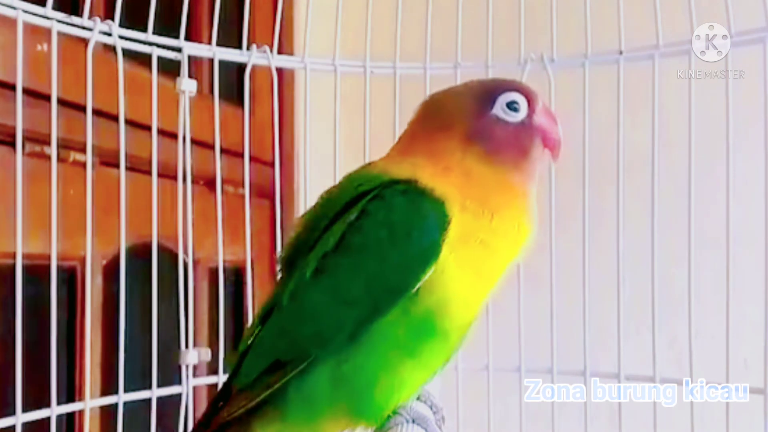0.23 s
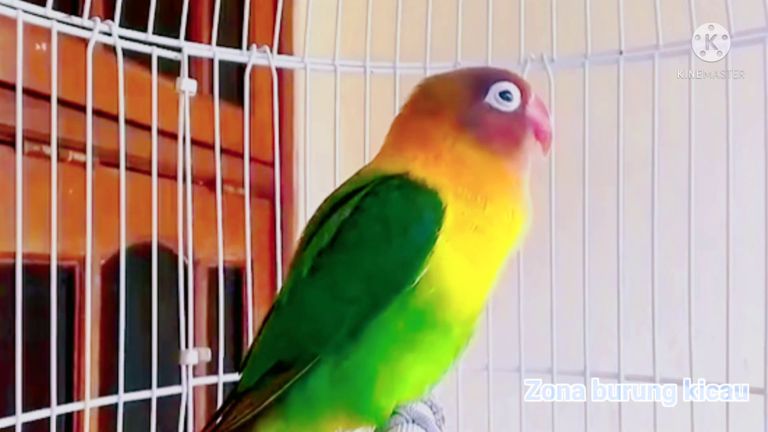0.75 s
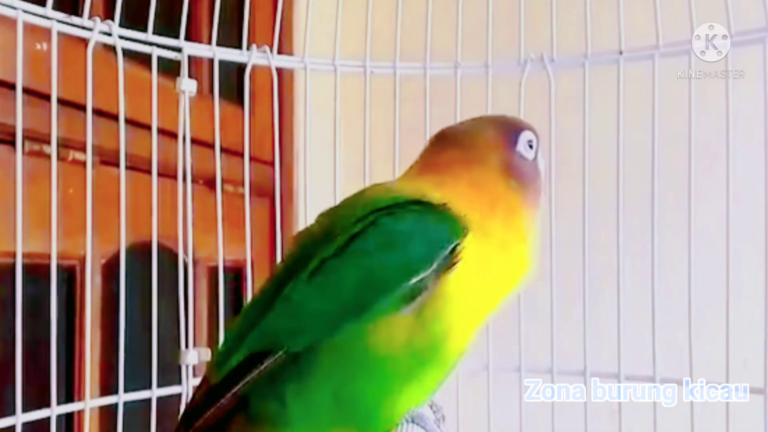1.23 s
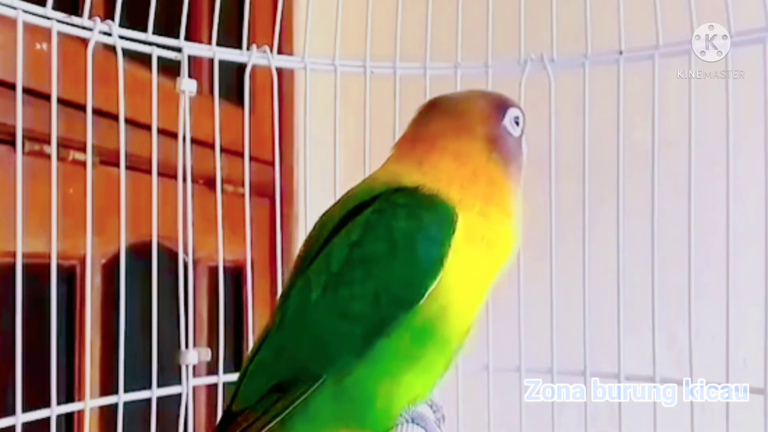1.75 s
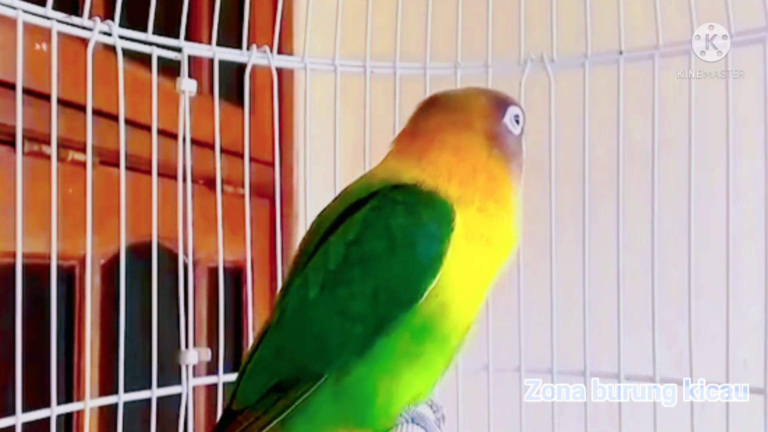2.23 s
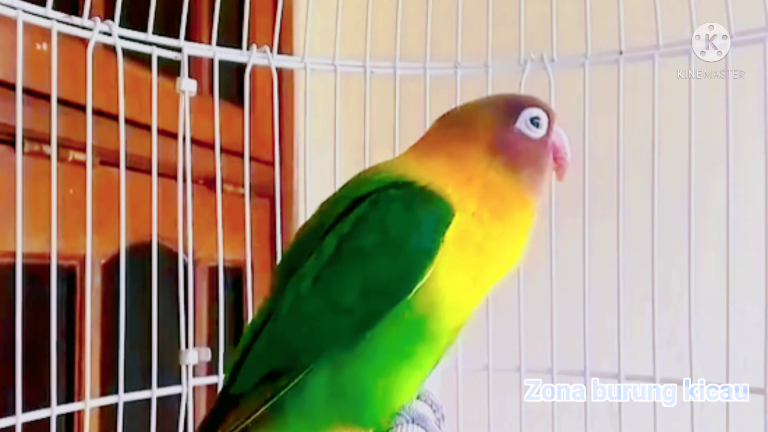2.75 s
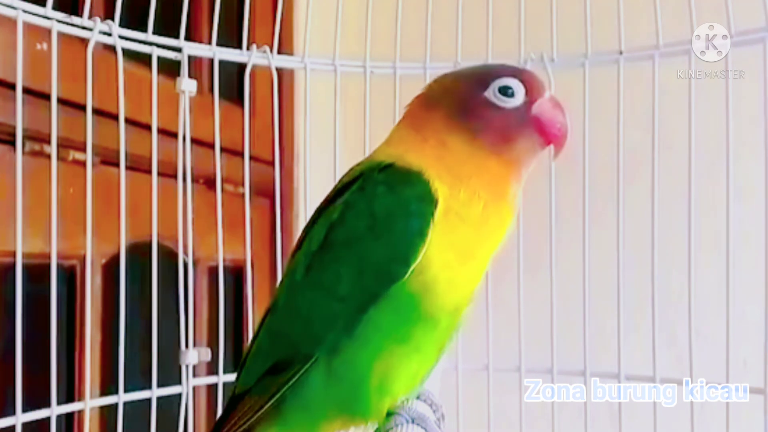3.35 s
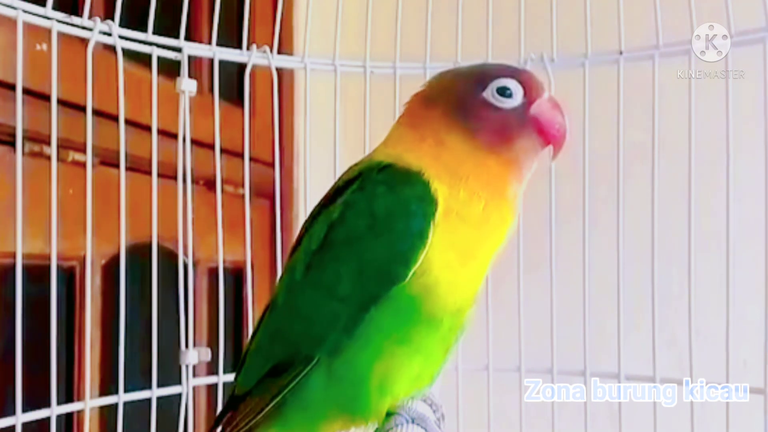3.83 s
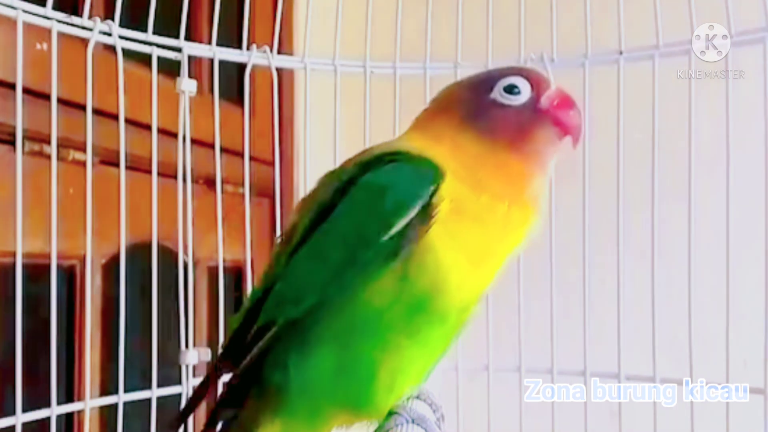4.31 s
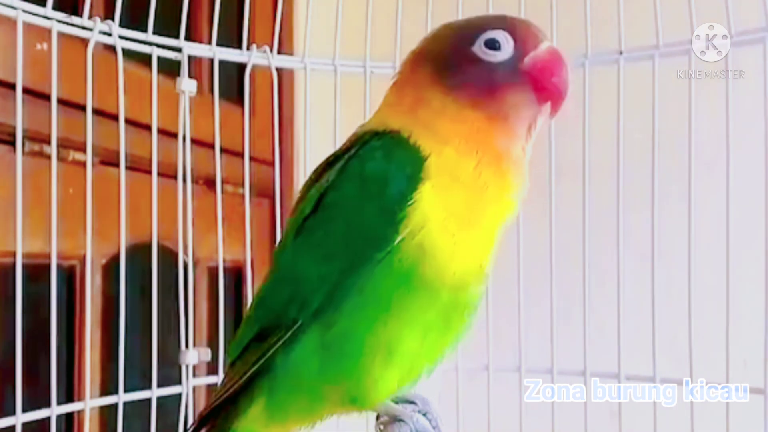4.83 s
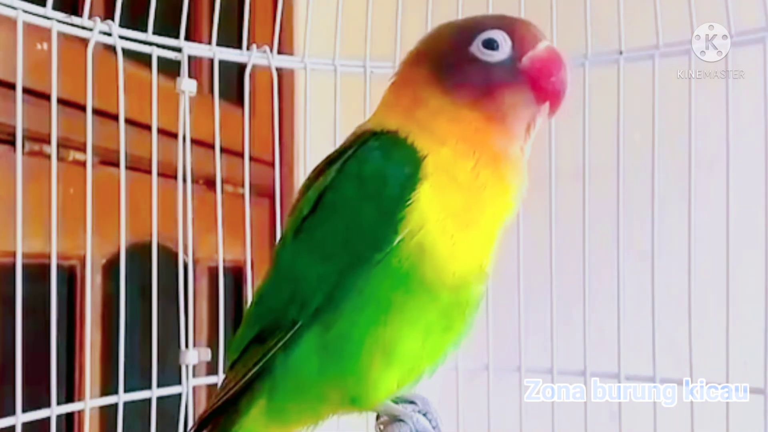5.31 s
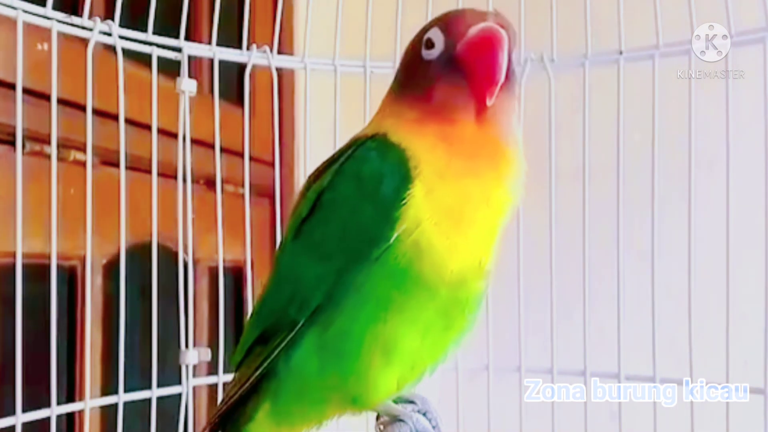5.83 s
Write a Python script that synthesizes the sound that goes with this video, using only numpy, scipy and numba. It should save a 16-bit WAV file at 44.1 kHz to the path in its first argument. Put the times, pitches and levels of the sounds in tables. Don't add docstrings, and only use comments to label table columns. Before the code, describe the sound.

Close to a phone microphone, a small parrot utters four sharp calls about a second and a half apart. Each leaps into a short clear whistle and breaks at once into a buzzy rattle with an upward flick. A very short high chirp comes near the end. The hard room rings briefly, a second parrot answers faintly farther off, and traffic swells low under light hiss.

```python
import sys
import numpy as np
from scipy import signal
from scipy.fft import rfft, irfft
from scipy.io import wavfile
from numba import njit

SR = 44100
rng = np.random.default_rng(int(sys.argv[2]) if len(sys.argv) > 2 else 0)


def file_out(sig):
    cols = np.atleast_2d(sig).T
    lim = np.clip(cols, -1, 1)
    pcm = np.round(lim * 32767).astype(np.int16)
    wavfile.write(sys.argv[1], SR, pcm)


def natural_amplitude(level_db):
    exponent = np.asarray(level_db, float) / 20
    return 10 ** exponent


N = 267687

# t/s, length/s, leap f/Hz, held f/Hz, beak move from partial 2 to 3 level/dB
WHISTLES = [
    (0.081, .103, 2720, 2447, -4),
    (1.308, .112, 3135, 2617, 3.5),
    (2.655, .107, 3180, 2438, -3.2),
    (4.323, 0.093, 2955, 2569, 2),
]
# lead length/s, lead f/Hz, settling time/s, early level/dB, late level/dB
OPENINGS = [(.011, 2120, 0.016, -1.5, -0.5), (.009, 2360, 0.022, 0, 3), (0.0072, 2160, .034, 2.8, -1),
            (0.0054, 2130, .026, -3.5, 1.65)]
# lead level/dB, leap level/dB, early and late fundamental level/dB, leap time/s
EFFORTS = [(-7, 1, -3, 1.5, .009), (-4, 0, -1.5, -2, .003), (-9, -1.5, -1, -0.7, .003),
           (-7.5, -1.5, -2.5, 2, .004)]
# beak move at the leap level/dB, closing upturn f/Hz, fade time/s
ENDINGS = [(0, 110, 0.017), (-3.5, 60, 0.016), (-1, 110, 0.012), (-2, 130, .012)]
WHISTLE_PARTIALS = (-2, -4.5, -3.5)
# t/s, length/s, held f/Hz, level/dB, swell before the flick level/dB
RATTLES = [
    (0.1864, .0855, 3175, -0.9, -1.76),
    (1.421, 0.095, 3260, -0.86, 0),
    (2.764, .09, 3112, -2.5, 5),
    (4.427, 0.082, 3548, -4, 6.5),
]
# fall time/s, lowest f/Hz, recovery time/s, flick level/dB, beak move 1 to 2 level/dB
DIPS = [(0.045, 3000, 0.014, 0.2, 2.5), (0.034, 3135, 0.024, -5.5, 3.4), (0.022, 2860, .026, 0, 3),
        (0.016, 3040, 0.02, -3, 3.5)]
# strike level/dB, f/Hz after the first drop, held flutter/share of pitch, partial 3 level/dB
STRIKES = [(1.5, 3700, 0.041, 1.8), (1.5, 3640, 0.05, 0), (2.5, 3770, 0.032, 1.27), (2.5, 4000, 0.025, 0.5)]
RATTLE_PARTIALS = (1.64, 0.66, -2.5)
# t/s, f/Hz, effort level/dB, flutter/share of pitch
CHIRP = [
    (5.679, 6200, -5.7, 0.013),
    (5.684, 5543, -0.4, 0.0045),
    (5.694, 5758, -1.74, .005),
    (5.695, 6480, -3.5, 0.029),
    (5.699, 6510, -14.5, .02),
]
CHIRP_PARTIALS = (3.15, -13.5, -28)
CHIRP_LEAD_PARTIALS = (-21, -27, -2)
# f/Hz, level at full effort/dB
THROAT = [(2100, -22.5), (3100, -22), (3900, -12.5), (5100, -17), (6300, -13.5), (7600, -22), (9500, -39),
          (15000, -43)]
# f/Hz, level against the lower ones/dB
UPPER_PARTIALS = [(7000, -20), (9000, -23.5), (11000, -21), (13500, -28), (15500, -35)]
# t/s, level/dB
SNAPS = [(.077, -36.5), (0.186, -42.5), (1.308, -43.5), (1.419, -40.5), (2.655, -45), (2.759, -38),
         (4.32, -45), (4.416, -43)]
# delay/s, level/dB
ECHOES = [(.0021, -22), (.0057, -18.5), (0.012, -12.5), (.017, -25.5), (0.025, -15.5)]
# f/Hz, time/s
ROOM_FALL = [(1500, 0.15), (3000, .45), (5000, 0.42), (7500, 0.37), (10000, 0.37), (14000, 0.25)]
# f/Hz, level/dB
ROOM_LEVEL = [(1500, -19.5), (3000, 6), (5000, 2.5), (7500, 4.5), (10000, 7), (14000, 9.5)]
# t/s, length/s, start f/Hz, end f/Hz, level/dB
FAR_CALLS = [(.001, .045, 2543, 2500, -24.5), (0.048, 0.03, 3580, 3100, -29.5),
             (1.19, 0.027, 2777, 2568, -31), (1.22, .05, 2622, 2712, -28), (1.273, .035, 4000, 3323, -27),
             (2.531, 0.028, 2388, 2415, -33), (2.555, .032, 3172, 2553, -29),
             (2.588, .065, 2418, 2620, -28.5), (2.784, 0.059, 3512, 2994, -32.5),
             (2.887, 0.058, 2732, 3302, -30)]
# t/s, length/s, start f/Hz, end f/Hz, level/dB
FAR_PEEPS = [(1.18, .01, 7020, 6465, -28.5), (1.186, .045, 4100, 3750, -41), (2.522, .01, 3900, 3976, -48),
             (2.855, .025, 4150, 4350, -25.5), (3.231, .007, 8000, 6784, -26.5),
             (3.238, .008, 6784, 7700, -25), (3.232, .006, 9700, 9000, -26), (3.247, .02, 5900, 5500, -39),
             (4.235, .055, 3842, 3724, -55.5), (4.267, 0.019, 4520, 4425, -40.5),
             (4.281, .008, 6770, 5285, -24), (4.978, .014, 7400, 8010, -33), (4.982, .012, 6300, 5900, -46),
             (4.993, .009, 7300, 6250, -23), (5.005, .014, 5900, 6240, -25.5),
             (5.617, .008, 7020, 6020, -23), (5.626, .016, 5650, 5840, -28.5)]
FAR_FLUTTER = (.015, .015)
FAR_GLIDE_FLUTTER = (0.58, 0.056)
FAR_FADE = (-7.5, -3.5)
FAR_PARTIALS = [
    (-3.5, .1, 0),
    (-1.65, -13, -10),
]
# t/s, length/s, start f/Hz, end f/Hz, level/dB
DOVE = [
    (2.266, .06, 950, 930, -63.5),
    (2.387, .08, 900, 950, -62.5),
    (2.588, .04, 930, 930, -63),
    (2.68, .04, 940, 920, -65.5),
    (2.954, .07, 940, 930, -62.5),
]
# peak t/s, rise/s, fall/s, level/dB
PASSES = [
    (.02, 0.16, .2, -63.5),
    (.55, .15, 0.46, -64),
    (1.06, 0.034, 0.34, -50),
    (3.1, 0.43, 0.34, -63.5),
    (4.65, 0.12, 0.13, -39.5),
    (5.88, 0.24, 0.18, -53.5),
]
# peak t/s, rise/s, fall/s, level/dB
PUFFS = [(.24, 0.16, .07, -71), (.74, 0.22, .1, -70.5), (1.01, .06, .08, -58.5), (1.27, .07, 0.14, -65.5),
         (1.8, 0.13, 0.14, -62), (2.33, 0.16, .1, -75.5), (2.62, 0.065, 1, -71), (3.85, 0.11, 0.081, -74),
         (4.31, 0.14, 0.67, -84), (5.66, 0.21, .06, -79), (6.07, 0.086, .1, -87)]
# f/Hz, level per Hz/dB
TRAFFIC_COLOUR = [(35, -59.5), (60, -30), (248, -4.5), (286, -2), (350, -6), (752, -8.5), (2010, -26.5),
                  (2500, -40), (3250, -65.5), (5500, -120)]
AIR_COLOUR = [(12, -47.5), (20, -27), (50, -1.5), (70, -2.5), (154, 2), (200, -19), (260, -40.5),
              (440, -120)]
HISS_COLOUR = [(59, -36.5), (100, -2), (219, 3.5), (264, -9), (326, -7), (578, -13.5), (699, -11.5),
               (863, -10.5), (1490, -10.5), (2010, -13), (7140, -20), (9390, -30.5), (15600, -30.5)]

CLEAR_FLUTTER = .005


def near_parrot():
    no_bass = signal.butter(8, 2200, "high", fs=SR, output="sos")
    voice = signal.sosfilt(no_bass, syrinx(near_notes(), edge_s=0.00039))
    voice = voice + snaps()
    echoes = sum(natural_amplitude(db) * np.roll(voice, int(delay * SR)) for delay, db in ECHOES)
    return voice + echoes + natural_amplitude(-11.0) * room(voice, rise_s=0.014, gap_s=0.0036, stretch=0.78)


def near_notes():
    whistles = [whistle(*rows) for rows in zip(WHISTLES, OPENINGS, EFFORTS, ENDINGS)]
    rattles = [rattle(*rows) for rows in zip(RATTLES, DIPS, STRIKES)]
    start, lead_hz = CHIRP[0][0], 2142
    lead = sing([(start - 0.0026, lead_hz, -4, CLEAR_FLUTTER, 0),
                 (start + .001, lead_hz, 0, CLEAR_FLUTTER, 0)], CHIRP_LEAD_PARTIALS)
    chirp = sing([(*row, 0) for row in CHIRP], CHIRP_PARTIALS)
    return whistles + rattles + [lead, chirp]


def whistle(main, opening, effort, ending):
    start, length, leap_hz, held_hz, beak_db = main
    lead_s, lead_hz, settle_s, early_db, late_db = opening
    lead_db, leap_db, low_early_db, low_late_db, leap_s = effort
    leap_beak_db, upturn_hz, fade_s = ending
    leap_flutter = 0.054
    lead_flutter, half_rise_hz = 2 * CLEAR_FLUTTER, 149.6 / 2
    top, end = start + lead_s + leap_s, start + length
    held, fade = top + settle_s, end - fade_s
    sag_hz = leap_hz + .7 * (held_hz - leap_hz)
    note = sing([
        (start, lead_hz - half_rise_hz, lead_db - 2.5, lead_flutter, 0),
        (start + lead_s, lead_hz + half_rise_hz, lead_db - 2.0, lead_flutter, 0),
        (top, leap_hz, leap_db, leap_flutter, leap_beak_db),
        (top + .5 * settle_s, sag_hz, leap_db, leap_flutter, leap_beak_db),
        (held, held_hz, early_db, CLEAR_FLUTTER, beak_db / 2),
        ((held + fade) / 2, held_hz - 29, late_db, CLEAR_FLUTTER, beak_db),
        (fade, held_hz + upturn_hz * 0.4, late_db, CLEAR_FLUTTER, beak_db + 2.0),
        (end, held_hz + upturn_hz, -10.5, CLEAR_FLUTTER, beak_db),
    ], WHISTLE_PARTIALS)
    note[:, 2] += np.interp(note[:, 0], [held, fade], [low_early_db, low_late_db])
    return note


def rattle(main, dip, strike):
    start, length, held_hz, db, swell_db = main
    fall_s, dip_hz, recover_s, flick_db, beak_db = dip
    strike_db, drop_hz, flutter, third_db = strike
    strike_flutter = .075
    flick_s, flick_top_hz = 0.017, 5045
    end = start + length
    flick, low = end - flick_s, start + fall_s
    first, second, third = RATTLE_PARTIALS
    return sing([
        (start, 4250, db + strike_db, strike_flutter, 0),
        (start + .009, drop_hz, db + strike_db / 2, strike_flutter, 0),
        (low, dip_hz, db - 0.5, strike_flutter * 0.65, 0),
        (low + recover_s, held_hz, db, flutter, beak_db),
        (flick, held_hz, db + swell_db, flutter, beak_db),
        (flick + flick_s * 0.13, 4150, flick_db - 3, strike_flutter * 0.34, 3),
        (flick + flick_s * 0.33, flick_top_hz, flick_db, strike_flutter, 0),
        (end, flick_top_hz, flick_db - 2, strike_flutter / 2, 0),
    ], (first, second, third + third_db), beak_moves=(-1, 1, 0))


def sing(rows, partials_db, beak_moves=(0, -1, 1)):
    s, *columns = np.transpose(rows)
    t = np.linspace(s[0], s[-1], 96)
    hz, effort_db, flutter, beak_db = (np.interp(t, s, column) for column in columns)
    levels = []
    for k, move in enumerate(beak_moves):
        throat_db = shape(THROAT, (k + 1) * hz)
        levels.append(effort_db + partials_db[k] + throat_db + move * beak_db)
    return np.transpose([t, hz, *levels, flutter])


def syrinx(notes, edge_s):
    out = np.zeros(N)
    beat = 2 * np.pi * np.cumsum(270 + 60 * around(centre_hz=32.58, width_hz=40)) / SR
    flutter = 1.25 * np.sin(beat) + .8 * np.tanh(around(centre_hz=500, width_hz=350))
    throb = np.sin(beat + 1.2) + .9 * np.tanh(around(centre_hz=150, width_hz=150))
    sway_db = [4.1 * np.tanh(around(centre_hz=42.8, width_hz=30)) for _ in range(6)]
    rasp = around(centre_hz=990, width_hz=1900)
    for note in notes:
        s, *columns = np.transpose(note)
        i = np.arange(int(s[0] * SR), int(s[-1] * SR))
        hz, db1, db2, db3, depth = (np.interp(i / SR, s, column) for column in columns)
        fluttering_hz = hz * (1 + np.clip(depth, 0, .2) * flutter[i])
        turns = 2 * np.pi * np.cumsum(fluttering_hz) / SR
        loudest_db = np.maximum(np.maximum(db1, db2), db3)
        top_db = 0.91 * loudest_db + 0.17 * np.maximum(db3, -40)
        levels = [db1, db2, db3] + [top_db + shape(UPPER_PARTIALS, k * hz) for k in (4, 5, 6)]
        rough = 2.5 * depth * rasp[i]
        tone = np.zeros(len(i))
        for k, db in enumerate(levels, start=1):
            audible = np.clip((15800 - k * hz) / 1000, 0, 1)
            grit = 1 + (k > 1) * rough
            tone += natural_amplitude(db + sway_db[k - 1][i]) * audible * grit * np.sin(k * turns)
        edge = np.clip(np.minimum(i - i[0], i[-1] - i) / (edge_s * SR), 0, 1)
        out[i] += np.sqrt(2) * tone * natural_amplitude(26 * depth * throb[i]) * edge
    return out


def snaps():
    out = np.zeros(N)
    t = np.arange(int(.03 * SR)) / SR
    for s, db in SNAPS:
        start = int(s * SR)
        out[start:start + len(t)] += natural_amplitude(db) * np.exp(-t / 0.026) * rng.standard_normal(len(t))
    return signal.sosfilt(signal.butter(2, [900, 2200], "band", fs=SR, output="sos"), out)


def room(x, rise_s, gap_s, stretch):
    t = np.arange(SR) / SR
    tail = np.zeros(SR)
    for hz in 1400 * 2 ** np.arange(0, 3.6, .5):
        band = signal.butter(2, [hz / 2 ** .25, hz * 2 ** .25], "band", fs=SR, output="sos")
        fall = natural_amplitude(shape(ROOM_LEVEL, hz) - 60 * t / stretch / shape(ROOM_FALL, hz))
        tail += fall * signal.sosfilt(band, rng.standard_normal(SR))
    tail = tail * (1 - np.exp(-np.maximum(t - gap_s, 0) / rise_s))
    return signal.fftconvolve(x, tail / np.sqrt(np.sum(tail ** 2)))[:N]


def far_parrot():
    voice = syrinx(far_notes(), edge_s=0.0011)
    return natural_amplitude(-1.5) * voice + natural_amplitude(6.5) * room(voice, rise_s=0.0031, gap_s=0.0019, stretch=1.3)


def far_notes():
    notes = []
    kinds = zip((FAR_CALLS, FAR_PEEPS), FAR_FLUTTER, FAR_GLIDE_FLUTTER, FAR_FADE, FAR_PARTIALS)
    for rows, flutter, glide, fade_db, partials_db in kinds:
        for s, length, start_hz, end_hz, db in rows:
            rough = flutter + glide * abs(np.log(end_hz / start_hz))
            glide_rows = [(s, start_hz, db, rough, 0), (s + length, end_hz, db + fade_db, rough, 0)]
            notes.append(sing(glide_rows, partials_db))
    return notes


def dove():
    out = np.zeros(N)
    for s, length, start_hz, end_hz, db in DOVE:
        u = np.arange(int(length * SR)) / (length * SR)
        turns = 2 * np.pi * np.cumsum(start_hz + (end_hz - start_hz) * u) / SR
        start = int(s * SR)
        out[start:start + len(u)] += natural_amplitude(db) * np.sin(np.pi * u) ** 0.55 * np.sin(turns)
    return out


def background(calls):
    loud = follower(calls, 1 / (0.0036 * SR), 1 / (0.1 * SR))
    duck_db = -6 * loud / (loud + natural_amplitude(-26))
    return traffic(duck_db) + moving_air() + hiss(duck_db)


def traffic(duck_db):
    flicker_db = 1.5 * around(centre_hz=3.5, width_hz=6.9)
    return coloured(TRAFFIC_COLOUR) * swells(PASSES, floor_db=-63) * natural_amplitude(duck_db - 7.0 + flicker_db)


def moving_air():
    flicker_db = 2.7 * around(centre_hz=6.6, width_hz=6)
    return coloured(AIR_COLOUR) * swells(PUFFS, floor_db=-87) * natural_amplitude(0.6 + flicker_db)


def hiss(duck_db):
    return coloured(HISS_COLOUR) * natural_amplitude(-63.5 + .5 * duck_db)


def swells(rows, floor_db):
    t = np.arange(N) / SR
    level = natural_amplitude(floor_db)
    for peak, rise, fall, db in rows:
        level = level + natural_amplitude(db - 10 * np.abs(t - peak) / np.where(t < peak, rise, fall))
    return level


def shape(points, hz):
    f, v = np.transpose(points)
    return np.interp(np.log(np.maximum(hz, 1)), np.log(f), v)


def unit(x):
    return x / np.sqrt(np.mean(x ** 2))


def coloured(points):
    colour = natural_amplitude(shape(points, np.fft.rfftfreq(N, 1 / SR)))
    return unit(irfft(rfft(rng.standard_normal(N)) * colour, N))


def around(centre_hz, width_hz):
    hz = np.fft.rfftfreq(N, 1 / SR)
    bell = np.exp(-.5 * ((hz - centre_hz) / width_hz) ** 2)
    return unit(irfft(rfft(rng.standard_normal(N)) * bell, N))


@njit
def follower(x, attack, release):
    level, out = 0., np.empty(len(x))
    for i in range(len(x)):
        size = abs(x[i])
        level += (size - level) * (attack if size > level else release)
        out[i] = level
    return out


def scene():
    near = natural_amplitude(2.0) * near_parrot()
    return (near + far_parrot() + dove() + background(near))[None]


def roll_off(x):
    return signal.sosfilt(signal.butter(12, 15760, fs=SR, output="sos"), x)


def record(dry):
    ahead = int(.005 * SR)
    loud = np.roll(follower(dry[0], 1 / (0.0013 * SR), 1 / (.06 * SR)), -ahead)
    limited = dry * np.minimum(natural_amplitude(-11.0) / (loud + 1e-9), 1) ** 0.78
    rumble_band = signal.butter(2, [25, 90], "band", fs=SR, output="sos")
    mix = limited + 0.0065 * signal.sosfilt(rumble_band, limited ** 2)
    treble_limit = signal.ellip(8, .2, 60, 15650, fs=SR, output="sos")
    mix = signal.sosfilt(treble_limit, mix)
    return roll_off(mix)


dry = scene()
out = record(dry)
file_out(out)
```